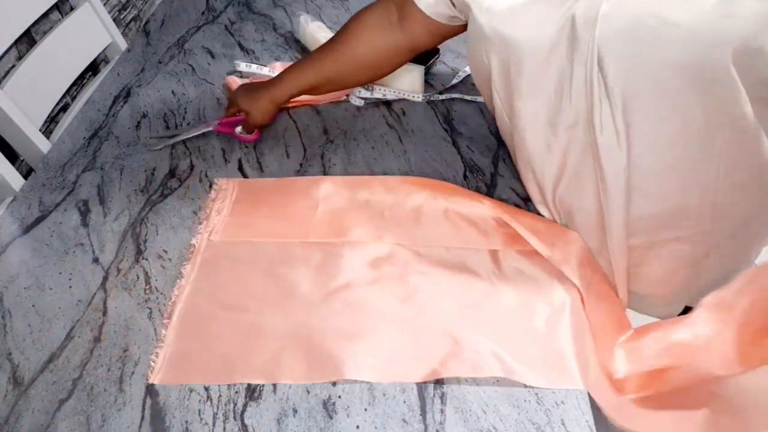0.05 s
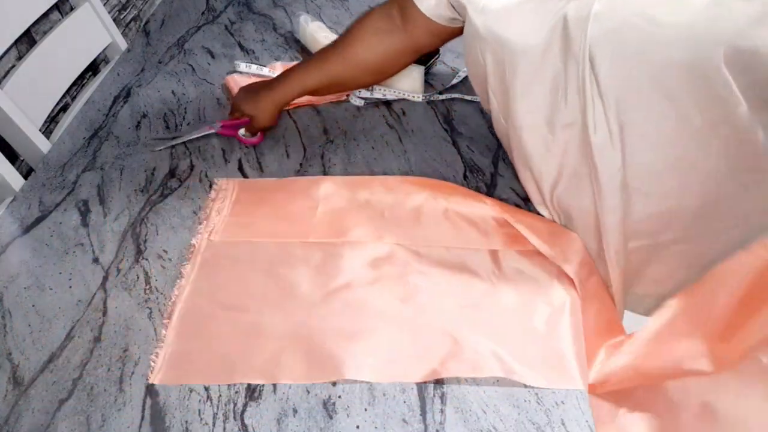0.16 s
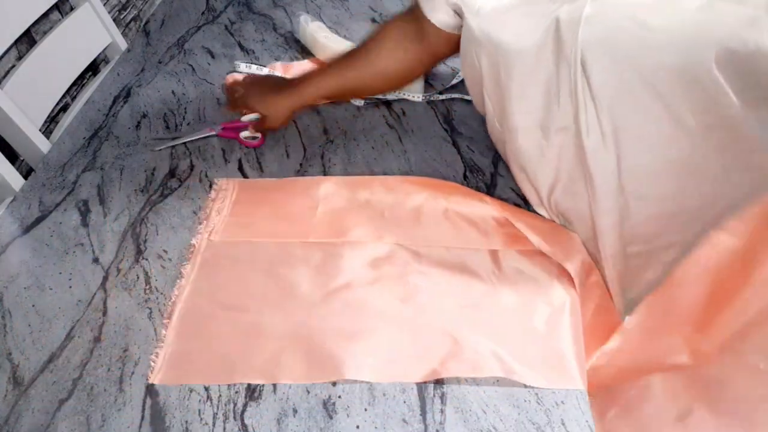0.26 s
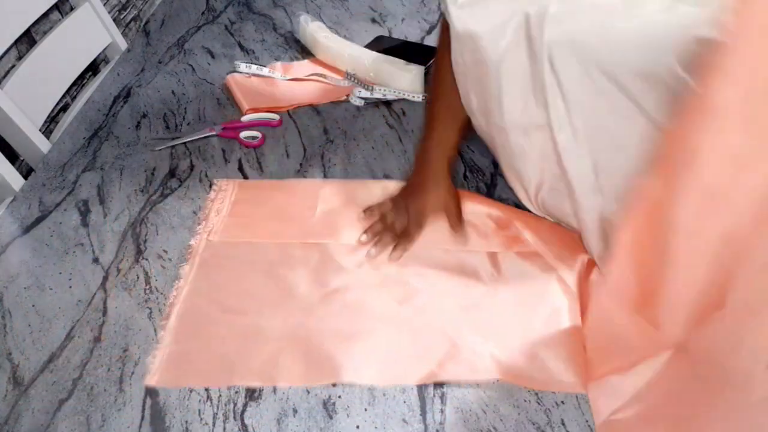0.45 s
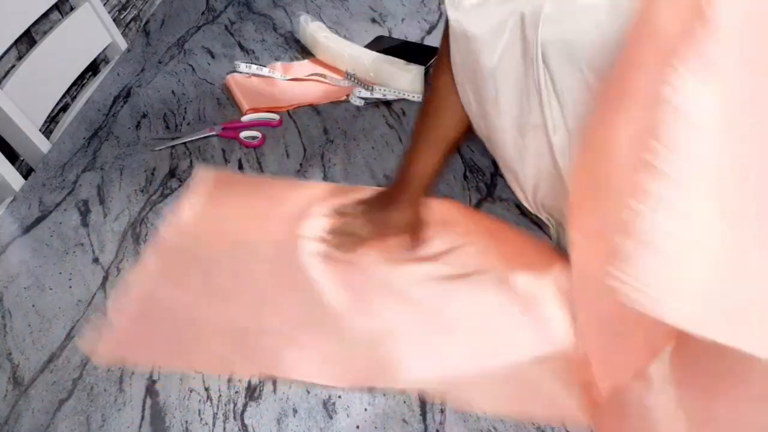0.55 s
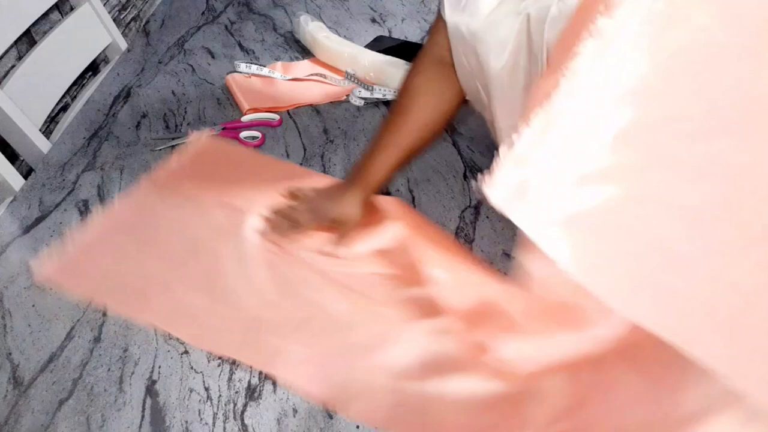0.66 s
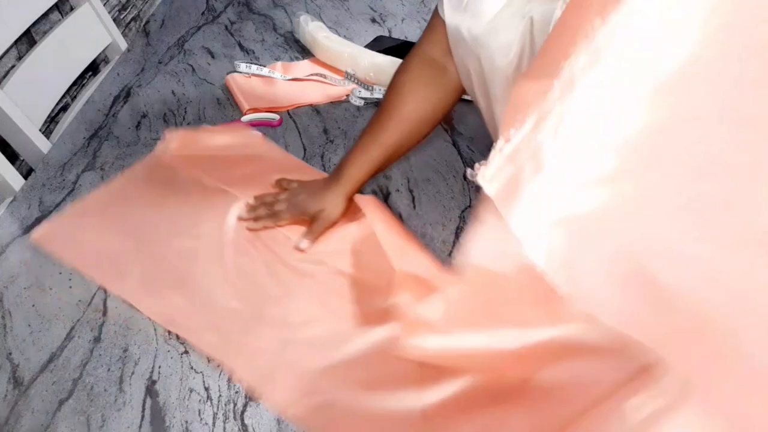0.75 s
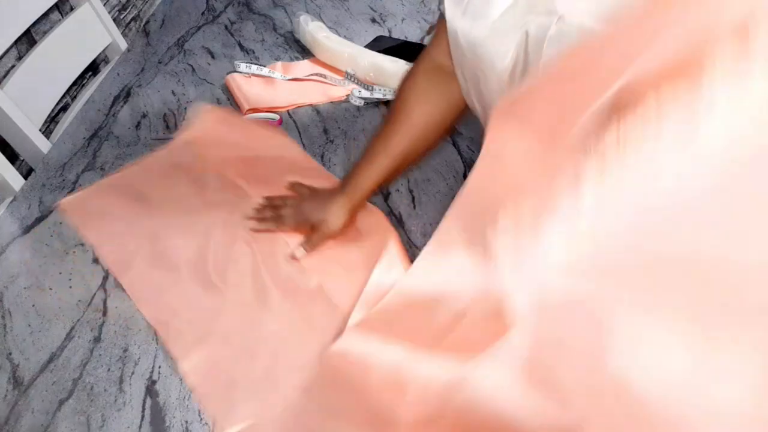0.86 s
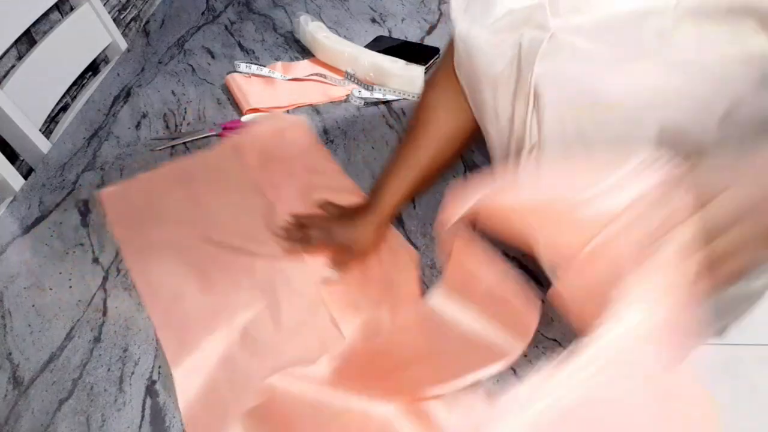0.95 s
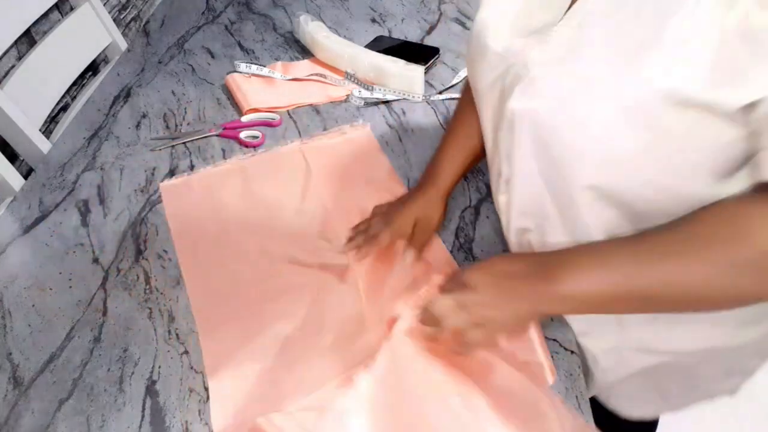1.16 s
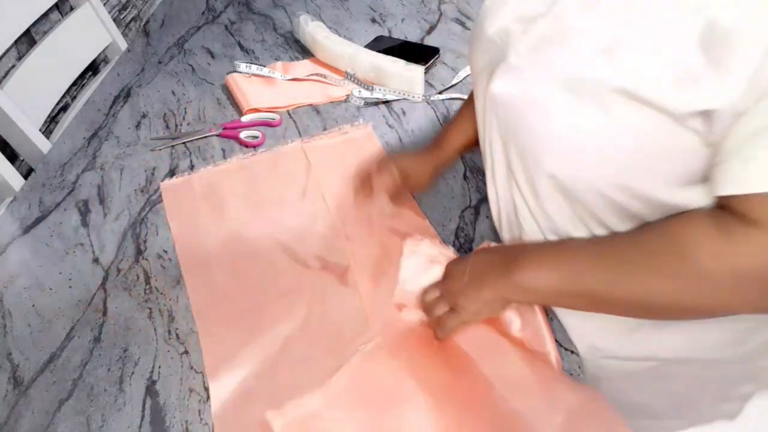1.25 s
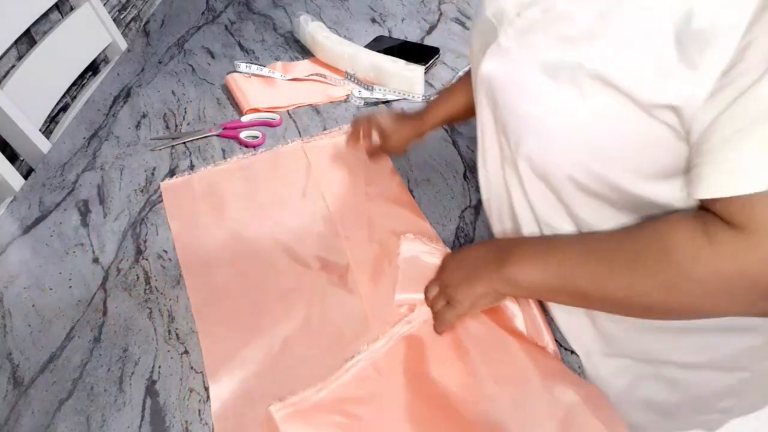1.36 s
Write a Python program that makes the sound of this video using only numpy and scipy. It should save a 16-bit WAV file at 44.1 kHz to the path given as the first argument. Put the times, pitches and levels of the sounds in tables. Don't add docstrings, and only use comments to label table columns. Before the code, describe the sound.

Scissors land on a stone table: a light knock at 0.04 seconds, then a loud, bright clack with a rapid clatter at 0.21-0.25, ringing through a hard small room. From about 0.55 a hand drags stiff satin, with hissing, breathy whistling rubs and soft low pats until 0.8. The rustle continues, fading after 1.1, with a tiny hem flick near 1.28 over faint fan hum.

```python
import sys
import numpy as np
from scipy import signal
from scipy.fft import rfft, irfft, next_fast_len
from scipy.io import wavfile
from scipy.ndimage import uniform_filter1d, map_coordinates

SR = 44100
rng = np.random.default_rng(int(sys.argv[2]) if len(sys.argv) > 2 else 0)


def generate_wav(signal):
    frames = np.transpose(np.atleast_2d(signal))
    scaled = np.clip(frames, -1, 1) * 32767
    pcm = np.round(scaled).astype(np.int16)
    wavfile.write(sys.argv[1], SR, pcm)


def amplitude_ratio(level_db):
    exponent = np.asarray(level_db, float) / 20
    return 10 ** exponent


N = 61740


def unit(x):
    return x / np.sqrt(np.mean(x ** 2) + 1e-20)


def along(points, hz):
    point_hz, value = np.transpose(points)
    return np.interp(np.log(hz + 1), np.log(point_hz + 1), value)


def wobble(knots_per_s):
    knots = rng.standard_normal(int(N * knots_per_s / SR) + 4)
    return map_coordinates(knots, [np.arange(N) * knots_per_s / SR])


def filtered(x, response):
    m = next_fast_len(x.shape[-1] + SR // 2)
    spectrum = rfft(x, m) * response(np.fft.rfftfreq(m, 1 / SR))
    return irfft(spectrum, m)[..., :x.shape[-1]]


def high_pass(f, hz):
    return 1j * f / (hz + 1j * f)


def resonances(peaks):
    def response(f):
        total = 0
        for k, (hz, width_hz, db) in enumerate(peaks):
            total = total + (-1) ** k * amplitude_ratio(db) * 1j * f * width_hz / (hz * hz - f * f + 1j * f * width_hz)
        return total
    return response


def spread(pair):
    # (frequency [Hz], left-right correlation)
    alike = [(100, 0.87), (350, 0.93), (700, 0.45), (1400, 0.11), (4000, 0.13), (12000, 0)]

    def mid_side(hz):
        angle = np.arccos(np.clip(along(alike, hz), -1, 1)) / 2
        return np.array([np.cos(angle), np.sin(angle)])

    mid, side = filtered(pair, mid_side)
    return np.array([mid + side, mid - side])


def room_tail():
    # (frequency [Hz], t60 [s])
    decay = [(100, 0.64), (400, 0.48076), (1200, 0.56), (4000, 0.52), (9000, 0.38), (15000, 0.25)]
    first_wall_s, build_s = 0.00067, 0.0013
    hz, t, z = signal.stft(rng.standard_normal((2, SR // 2)), SR, nperseg=256)
    z = z * amplitude_ratio(-60 * t / along(decay, hz)[:, None])
    tail = signal.istft(z, SR, nperseg=256)[1]
    t = np.arange(tail.shape[1]) / SR
    tail = spread(tail) * np.clip((t - first_wall_s) / build_s, 0, 1)
    return tail / np.linalg.norm(tail[0])


def floor():
    # (frequency [Hz], density [dB per Hz])
    air_colour = [(30, -22), (100, 3.5), (200, -6.5), (400, -7.5), (800, -9), (2000, -19), (8000, -16.5),
                  (16000, -24)]
    # (frequency [Hz], level [dB rms])
    tones = [(49.6, -51.5), (64.5, -56), (99.5, -61), (145, -60.5), (300, -68)]
    t = np.arange(N) / SR
    noise = spread(rng.standard_normal((2, N)))
    air = unit(filtered(noise, lambda f: amplitude_ratio(along(air_colour, f))))
    hum = 0
    for hz, db in tones:
        level = amplitude_ratio(db + 2.5 + 0.73 * wobble(5.95))
        hum = hum + level * np.sin(2 * np.pi * (hz * t + rng.random()) + 0.5 * wobble(11))
    return amplitude_ratio(-52.5 + 0.5 + wobble(9.65)) * air + hum


def pats():
    # (time [s], level [dB])
    landings = [
        (0.571, -42),
        (0.685, -35.5),
        (.74, -41.5),
        (0.799, -41.5),
        (1.059, -55),
    ]
    # (frequency [Hz], width [Hz], level [dB])
    thud = [(138.89, 58.8, -4.5), (362, 89, -5), (710, 1000, -11.5)]
    blows = np.zeros(N)
    for s, db in landings:
        blows[round(s * SR)] = 300 * amplitude_ratio(db)
    direct = filtered(blows, resonances(thud))
    return 0.57 * direct + signal.fftconvolve(direct[None], room_tail(), axes=1)[:, :N]


def weave_hiss():
    # (frequency [Hz], density [dB per Hz])
    weave = [(120, -24), (200, -25.5), (851, -15.5), (1650, -8), (2510, -9.5), (2750, -10.5), (9580, -17),
             (13800, -18), (16000, -26)]
    catches_per_s, catch_spread_db, catch_share = 3000, 1.2, 0.4
    catches = rng.random((2, N)) < catches_per_s / SR
    catches = catches * amplitude_ratio(catch_spread_db * rng.exponential(size=(2, N)))
    catches = catches * rng.choice([-1, 1], (2, N))
    rub = spread(catch_share * unit(catches) + rng.standard_normal((2, N)))
    return unit(filtered(rub, lambda f: amplitude_ratio(along(weave, f))))


def palm_whistle():
    # (time [s], frequency [Hz], upper partials [dB])
    hollow = [
        (.55, 1046, -3),
        (.59, 1705, -10),
        (.65, 1597, -4.5),
        (.7, 1447, 4),
        (.8, 1399, -2.5),
        (.88, 1080, 6),
        (.95, 1199, 7),
        (1.009, 1588, -7),
        (1.199, 1700, 0),
    ]
    # (multiple of hollow frequency, width [Hz], level [dB])
    partials = [(1, 350, 1), (1.35, 420, -8.5), (2.15, 550, -9.5)]
    t = np.arange(N) / SR
    hollow_s, hollow_hz, upper_db = np.transpose(hollow)
    phase = 2 * np.pi * np.cumsum(np.interp(t, hollow_s, hollow_hz)) / SR
    upper_db = np.interp(t, hollow_s, upper_db)
    whistle = 0
    for multiple, width_hz, db in partials:
        noise = rng.standard_normal((2, 2, N))
        a, b = filtered(noise, lambda f: 1 / (1 + (2 * f / width_hz) ** 2))
        partial = unit(a * np.cos(multiple * phase) + b * np.sin(multiple * phase))
        whistle = whistle + amplitude_ratio(db + (db < 0) * upper_db) * partial
    return whistle


def hem_flick():
    flick_s, length_s, level_db, low_hz = 1.281, 0.014, -51, 7000
    t = np.arange(N) / SR
    puff = unit(filtered(rng.standard_normal((2, N)), lambda f: high_pass(f, low_hz) ** 2))
    return puff * amplitude_ratio(level_db) * np.exp(-((t - flick_s) / length_s) ** 2)


def cloth():
    # (time [s], weave hiss [dB], whistle over hiss [dB])
    strokes = [(0.46, -53, 18), (0.498, -59.5, -10), (0.554, -41.5, -3), (0.572, -45, -4), (0.584, -39, 1),
               (0.682, -39, 11.5), (0.732, -41.5, 4.5), (0.75, -42, 12), (0.822, -50, 7.5), (0.892, -43, 1),
               (1.006, -42, 1.5), (1.118, -49.5, -6), (1.182, -54, 0), (1.208, -60.5, 1), (1.244, -57, -18),
               (1.286, -57.5, -32), (1.318, -60.5, -12), (1.4, -65.5, -6)]
    t = np.arange(N) / SR
    s, hiss_db, whistle_db = np.transpose(strokes)
    drag = amplitude_ratio(np.interp(t, s, hiss_db, left=-120) + 1.113 * wobble(24.37))
    whistle_gain = amplitude_ratio(np.interp(t, s, whistle_db) - 3.5 + 2.1 * wobble(79.876))
    return drag * (amplitude_ratio(8.5) * weave_hiss() + whistle_gain * palm_whistle()) + hem_flick()


def scissors_crack(light, tilt_db):
    # (frequency [Hz], width [Hz], level [dB])
    touch = [(573, 49.71, -2.5), (846, 100, -1), (1087, 58, -0.5), (1497, 96, 7.5), (1830, 230, 2),
             (2300, 205.6, 2.5), (3320, 410, 0), (3630, 160, -24), (4360, 2500, -13)]
    # (frequency [Hz], width [Hz], level [dB])
    steel = [(410, 90, -6), (543, 46, 1), (780, 160, -2.5), (1206, 96, 5.5), (1676, 310, 0),
             (2551.3, 230, 1), (3100, 670, -6), (4200, 960, -1), (5700, 3500, -14), (12960, 14000, -25)]
    peaks, open_db = (touch, -6) if light else (steel, -13)

    def colour(f):
        tilt = amplitude_ratio(tilt_db * np.log2(f / 1500 + 0.089))
        return (resonances(peaks)(f) + amplitude_ratio(open_db)) * tilt * high_pass(f, 193) ** 2

    impulse = np.zeros(SR // 2)
    impulse[0] = 1
    crack = filtered(impulse, colour)
    return 8 * crack / np.linalg.norm(crack)


def table_ring(light):
    # (frequency [Hz], level under drop [dB], level under light touch [dB], t60 [s])
    modes = [(71, -6, -10, 0.14), (118.1, -1, 3, 0.31), (373.35, -4, -6, 0.44), (406.2, -1.5, -11, 0.34),
             (524, 0, -9, 0.36), (582, -13, -12, 0.18), (791, -12, -8, 0.27), (1123, -13, -12, 0.38),
             (1230, -12.5, -34, 0.21), (1774, -12, 1, 0.2031)]
    t = np.arange(SR // 2) / SR
    ring = 0
    for hz, drop_db, touch_db, t60_s in modes:
        level = amplitude_ratio((touch_db if light else drop_db) - 60 * t / t60_s)
        ring = ring + level * np.sin(2 * np.pi * hz * t + 0.55 * wobble(17.4)[:len(t)])
    return ring * (1 - np.exp(-t / 0.0061))


def scissors():
    # (time [s], level [dB], brightness [dB per octave], table ring [dB])
    contacts = [
        (-.05, -18.5, -5, -19),
        (0.0427, -19, -4, -9.5),
        (.176, -56.5, -12, -30),
        (0.2107, -14, -2, -31),
        (0.2149, -3, 0, -13),
        (0.2194, -11.5, -4.5, -26),
        (0.2332, -13, -6.5, -30),
        (.243, -20, -4, -36),
        (0.2524, -12, -8.5, -18),
    ]
    # (frequency [Hz], width [Hz], level [dB])
    tip = [(3930, 1170, 2.5)]
    room_db, light_before_s = 7.5, 0.2
    lead = SR // 10
    out = np.zeros((2, N + lead + SR))
    for s, db, tilt_db, ring_db in contacts:
        light = s < light_before_s
        crack = scissors_crack(light, tilt_db)
        hit = amplitude_ratio(room_db) * signal.fftconvolve(crack[None], room_tail(), axes=1)
        direct = filtered(crack, lambda f: resonances(tip)(f) + 0.59)
        hit[:, :len(crack)] += direct + amplitude_ratio(ring_db) * table_ring(light)
        start = round(s * SR) + lead
        out[:, start:][:, :hit.shape[1]] += amplitude_ratio(db) * hit
    return out[:, lead:lead + N]


def scene():
    left_db = 0.5
    return (floor() + pats() + cloth() + scissors()) * amplitude_ratio([[left_db], [-left_db]])


def low_pass(x):
    return signal.sosfilt(signal.butter(12, 16450, fs=SR, output="sos"), x)


def record(dry):
    # (time [s], dip [dB], dip length [s], step [dB])
    ducks = [
        (.362, -7, .008, -1.5),
        (.456, -3, .01, -2.5),
    ]
    # (frequency [Hz], width [Hz], level [dB])
    notch = [(9420, 1000, -7)]
    low_hz, top_hz, duck_back_s = 42, 15750, 0.51
    ceiling, knee = 1.74, 1.77
    t = np.arange(N) / SR
    gain_db = np.zeros(N)
    for s, dip_db, length_s, step_db in ducks:
        dip = dip_db * (t < s + length_s)
        step = step_db * np.clip((duck_back_s - t) / 0.021, 0, 1)
        gain_db += (t > s) * (dip + step)

    def microphone(f):
        return high_pass(f, low_hz) ** 3 * (1 - resonances(notch)(f)) * (f < top_hz)

    x = filtered(dry, microphone) * amplitude_ratio(uniform_filter1d(gain_db, size=88))
    mix = x / (1 + np.abs(x / ceiling) ** knee) ** (1 / knee)
    return low_pass(mix)


dry = scene()
out = record(dry)
generate_wav(out)
```